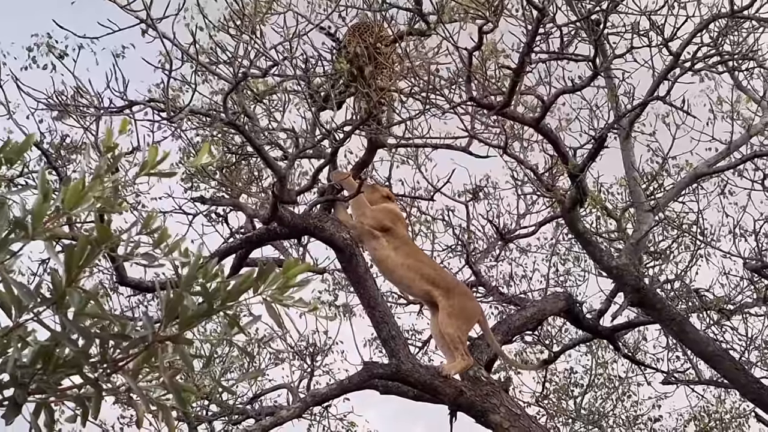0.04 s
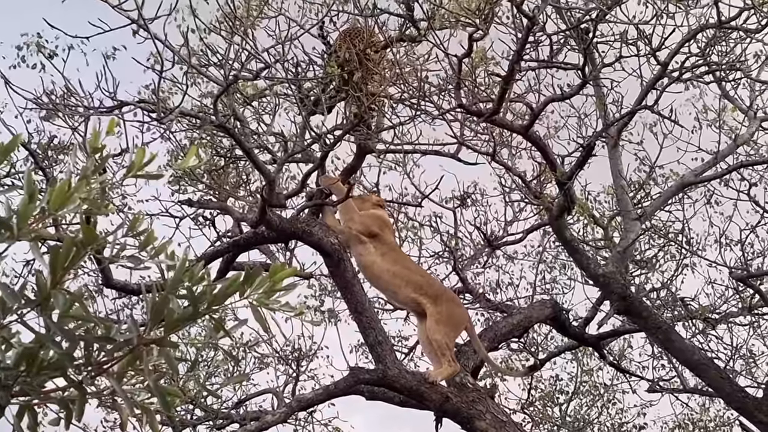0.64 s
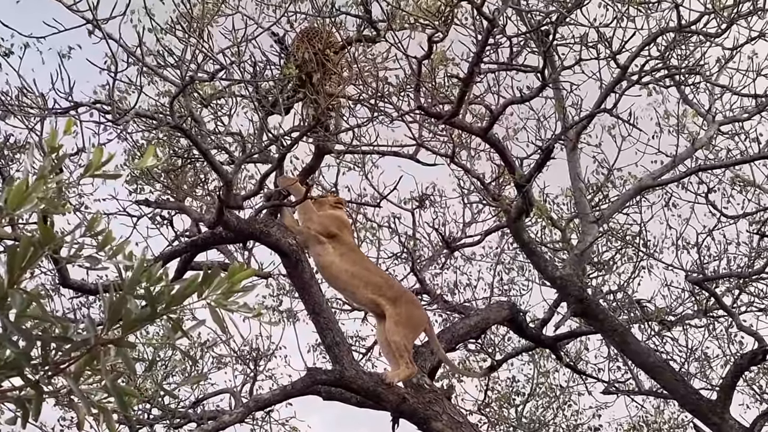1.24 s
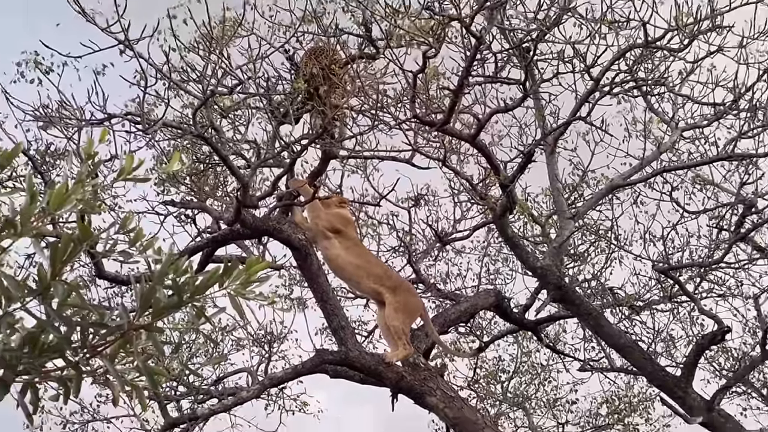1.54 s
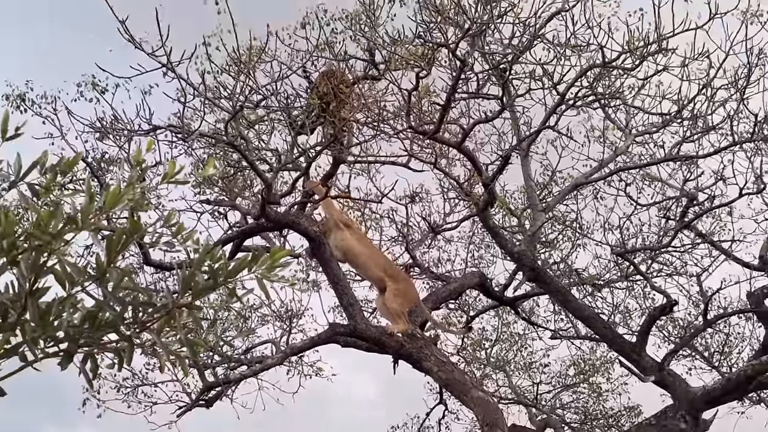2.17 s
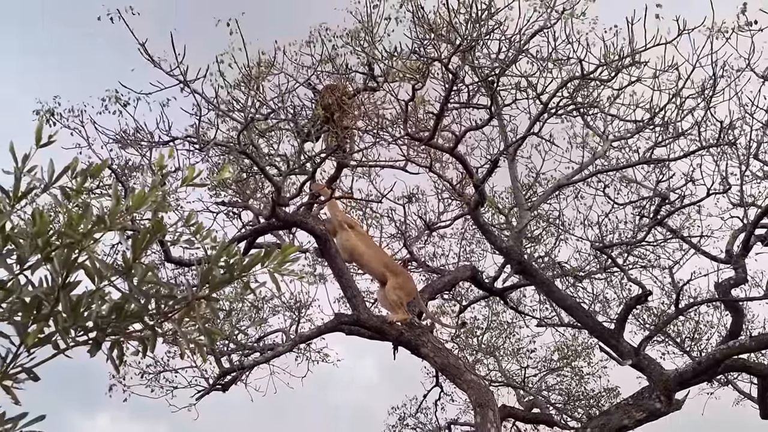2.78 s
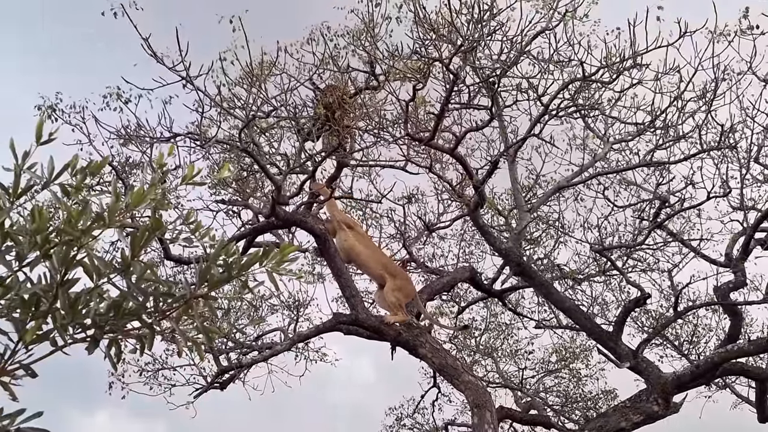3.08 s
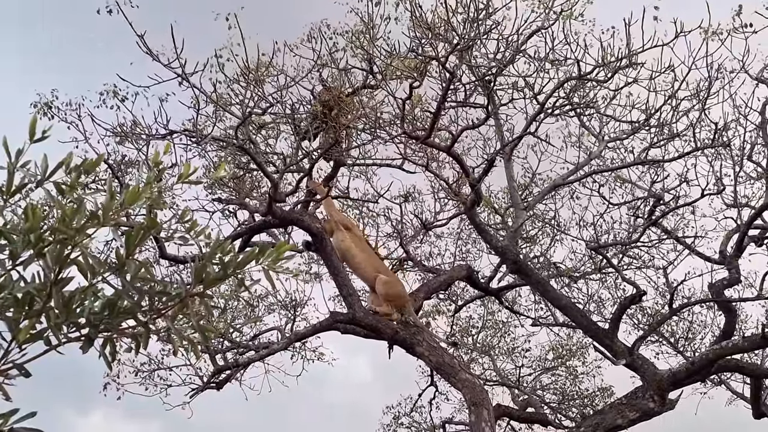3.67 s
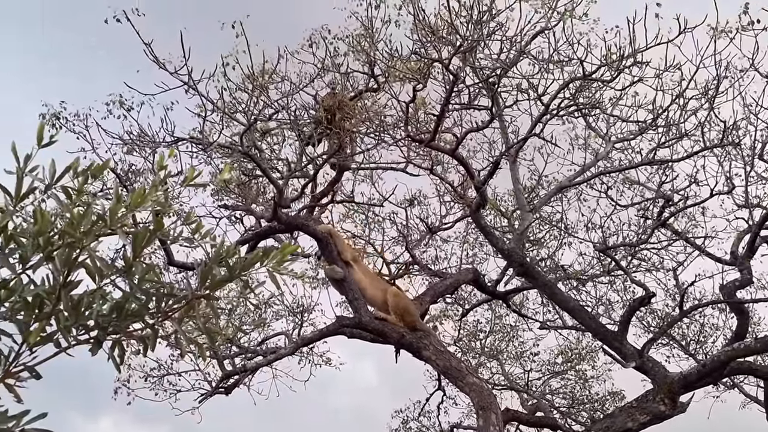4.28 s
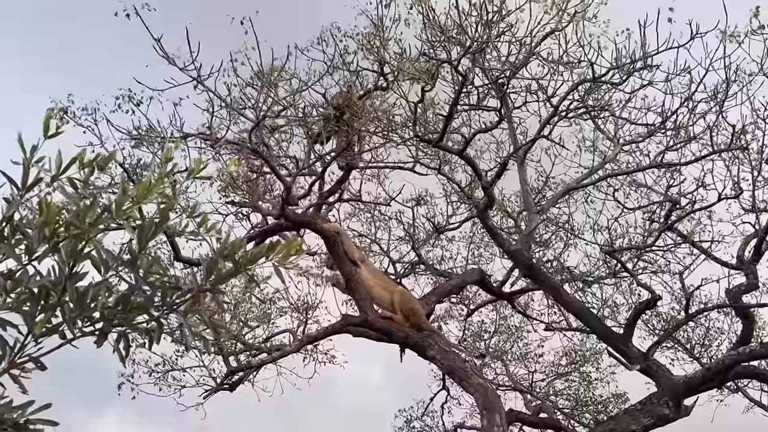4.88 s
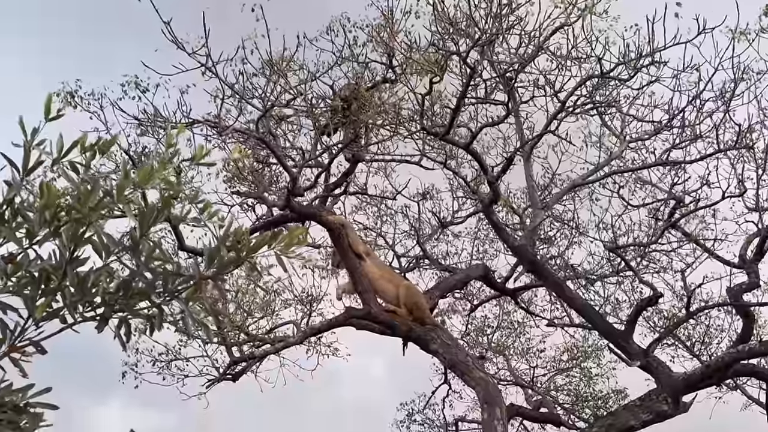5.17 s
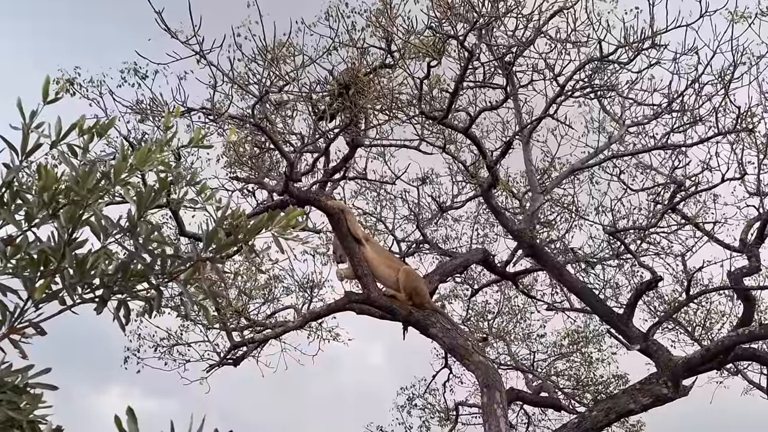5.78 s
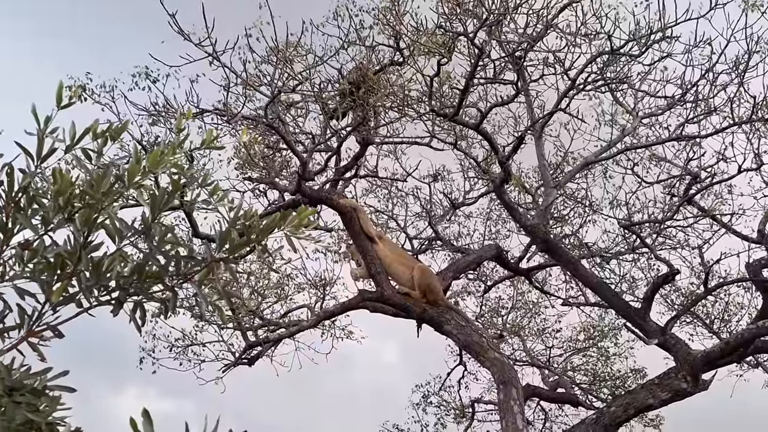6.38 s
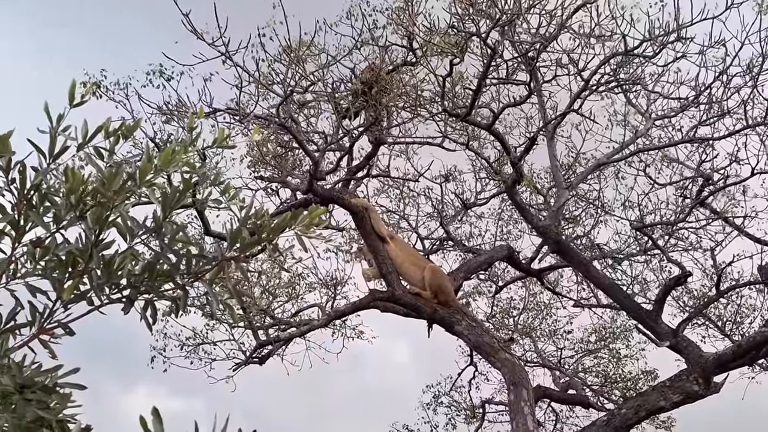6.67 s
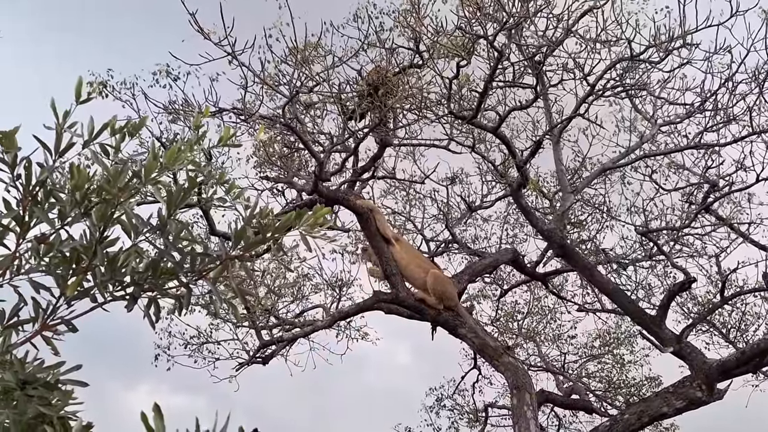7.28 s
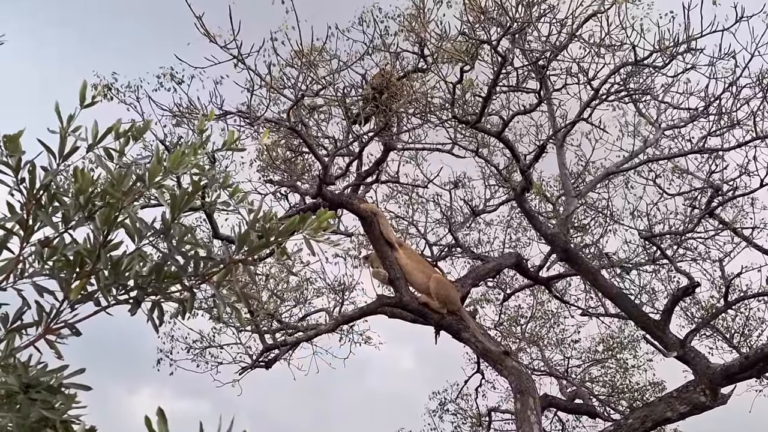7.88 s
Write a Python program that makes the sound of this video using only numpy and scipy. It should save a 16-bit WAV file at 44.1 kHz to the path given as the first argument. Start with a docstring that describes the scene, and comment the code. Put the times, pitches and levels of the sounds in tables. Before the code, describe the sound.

Harsh bursts of lion snarling alternate with throaty growls and hisses outdoors, then die down over a faint distant rumble.

```python
"""Lions quarrelling in a tree

Loud snarls over a kill alternate with low rattling growls, hisses and grunts. The voice is a source and a
filter: slack vocal folds slap shut 20-50 times a second, and each slap rings the long throat and lets out a
puff of turbulent air that rasps at the lips and teeth. Jaws and twigs click, twigs tick at random in the
branches, the trees scatter the sound, and a dull rumble of far growling lies under it all."""
import sys
import numpy as np
from scipy import signal
from scipy.fft import rfft, irfft
from scipy.io import wavfile
from scipy.ndimage import uniform_filter1d

SR = 44100
rng = np.random.default_rng(int(sys.argv[2]) if len(sys.argv) > 2 else 0)


def store_wav(level_fs):
    """Save 16-bit WAV to argv[1]."""
    pcm = np.round(np.clip(np.atleast_2d(level_fs), -1, 1) * 32767)
    wavfile.write(sys.argv[1], SR, pcm.T.astype(np.int16))


N = 354556
HZ = np.fft.rfftfreq(8192, 1 / SR)

# chest resonances: (frequency [Hz], bandwidth [Hz], gain [dB])
CHEST = [(90.5, 55, -3.5), (147.6, 35.7, 5.5), (194.3, 8.3, -0.5)]


def snarl(length, rise, rate, slowing, gape, chest_db, mouth_db, rasp_db, hiss_db,
          voice_sag_db, air_sag_db, mouth_hz, teeth_hz, sweep, step_db, *lips_hz):
    """Source and filter: fast, hard slaps excite resonances that glide as the jaws and lips move."""
    # resonances of the open mouth: (frequency [Hz], bandwidth [Hz], gain [dB])
    open_mouth = [(324, 20, -11.5), (383, 67, 1.5), (455.6, 72, -4), (524.6, 59, 2), (662, 49.5, -2),
                  (805, 110, -12)]
    # spectrum of air through the teeth: (frequency [Hz], gain [dB])
    teeth = [(1500, -38), (2400, -7), (2700, -4.5), (3100, -0.5), (3400, -4), (3750, -0.5), (4200, -3),
             (4900, -14), (5600, -15.5), (6700, -14), (7900, -13.5), (9000, -24.5), (11500, -23.5),
             (16000, -32)]
    t = np.arange(0, length + .11, 1 / SR)
    ahead = t + .011  # the push comes just before the ring
    voice_db = push(ahead, length, rise, onset_db=18, sag_db=voice_sag_db, settle=.46)
    rasp_db = rasp_db + push(ahead, length, rise, onset_db=30, sag_db=air_sag_db, settle=.7)
    hiss_db = hiss_db + push(ahead, length, rise * 1.13, onset_db=38, sag_db=air_sag_db, settle=.7)
    pressure = np.exp(-t / .1)
    slap_rate = rate * (1 - slowing * (1 - pressure))
    slaps, flow = folds(t, length, slap_rate, limp_db=.5, uneven_db=1.8, puff_s=.018, leak=.2 + .7 * gape)

    stretch = (mouth_hz / 470) ** .28  # the chest resonances partly follow the mouth
    damping = 1 + .94 * gape
    chest_modes = [(hz * stretch, width * damping, db) for hz, width, db in CHEST]
    groan_hz = 150.2 * stretch * (1 + .16 * pressure + .06 * wander(len(t), 25))
    chest = throat(slaps, flow, chest_db + voice_db, chest_modes, rough=.05)
    chest = formants(chest, [groan_hz], width=41.4 * damping, spill_db=-3)
    closing_hz = mouth_hz * (1 - .1 * (np.minimum(t / length, 1) - .5))  # falls as the jaws close
    mouth = throat(slaps, flow, mouth_db + voice_db, open_mouth, rough=.3)
    mouth = formants(mouth, [closing_hz], width=95, spill_db=-11)

    rasp, hiss = turbulence(slaps, build_up(flow), rasp_db, hiss_db, teeth,
                            snap=.04, spittle_db=3.5, pulsing=.95)
    # the lip resonances quiver, and sweep up as the lips are drawn back
    bared = np.interp(t, [0, rise, max(length, rise)], [0, 1, .55]) ** 1.5
    centres = [hz * (1 - sweep * (1 - bared)) * (1 + .025 * wander(len(t), 50)) for hz in lips_hz]
    rasp = formants(rasp, centres, width=85, spill_db=-18.5, step_db=step_db)
    upper_ring = gain_of(-.5) * resonate(hiss, teeth_hz, width=120)
    lower_ring = gain_of(-5) * resonate(hiss, .71 * teeth_hz, width=89)
    hiss = hiss + upper_ring + lower_ring
    return gain_of(-3.5) * chest + gain_of(-5) * mouth + gain_of(-8.5) * rasp + gain_of(-2.4) * hiss


def growl(row, mouth_modes, chest_gain_db, mouth_gain_db, puff_s, rough, limp_db):
    """Pulse excitation of steady resonances: slow, soft slaps gurgle; air wheezes at lips and teeth."""
    length, rate, leak, *levels_db, swell_db, mouth_hz, teeth_hz, step_db = row[:-3]
    lips_hz = row[-3:]
    t = np.arange(0, length + .11, 1 / SR)
    ramp_db = swell_db * (np.minimum(t / length, 1) - .5)
    chest_db, mouth_db, rasp_db, hiss_db = (db + ramp_db for db in levels_db)
    slaps, flow = folds(t, length, np.full(len(t), rate), limp_db, uneven_db=1.7, puff_s=puff_s, leak=leak)
    flow = build_up(flow)
    chest = throat(slaps, flow, chest_db + chest_gain_db, CHEST, rough=.17)
    mouth = throat(slaps, flow, mouth_db + mouth_gain_db, mouth_modes, rough)
    mouth = formants(mouth, [mouth_hz], width=60, spill_db=-10.5)
    # spectrum of air between tongue and palate: (frequency [Hz], gain [dB])
    palate = [(1500, -33.5), (2700, -6), (3300, 1), (4100, -2), (4700, -4.5), (5400, -8), (6500, -9),
              (7900, -8), (8900, -18), (11500, -30), (16000, -35.5)]
    rasp, hiss = turbulence(slaps, flow, rasp_db, hiss_db, palate, snap=.01, spittle_db=5, pulsing=.55)
    rasp = formants(rasp, lips_hz, width=57, spill_db=-11.5, step_db=step_db)
    hiss = hiss + gain_of(8.5) * resonate(hiss, teeth_hz, width=100)
    return chest + mouth + gain_of(-6) * rasp + gain_of(-7.5) * hiss


def push(t, length, rise, onset_db, sag_db, settle):
    """Breath pressure sets the level [dB]: it rises to 0, then changes by -sag_db as the air is spent."""
    spent = np.clip((t - rise) / max(length - rise, .01), 0, 1)
    attack_db = -onset_db * np.clip(1 - t / rise, 0, 1) ** 1.88
    return attack_db - sag_db * np.expm1(-spent / settle) / np.expm1(-1 / settle)


def folds(t, end, rate, limp_db, uneven_db, puff_s, leak):
    """Glottal source: slaps with jitter and shimmer, and the air flow that bursts out after each."""
    cycles = np.cumsum(rate * (1 + .018 * wander(len(t), 40))) / SR
    at = np.flatnonzero((np.diff(np.floor(cycles), prepend=-1) > 0) & (t < end))
    limp = unit_rms(gain_of(-limp_db * (np.arange(len(at)) % 2)))  # weakens every second slap
    shimmer = gain_of(uneven_db * rng.standard_normal(64)[:len(at)])
    slaps = np.zeros(len(t))
    slaps[at] = np.sqrt(SR / rate[at]) * limp * shimmer
    puffs = unit_rms(decay(slaps, puff_s))
    stream = leak * np.exp(-np.maximum(t - end, 0) / .034)  # steady air between the slaps
    attack = np.minimum(t / .0037, 1)
    return slaps, unit_rms((puffs + stream) * attack)


def build_up(flow):
    """First-order lag: deep in the throat each puff takes a moment to build up."""
    return unit_rms(decay(flow, tau_s=.0012))


def throat(slaps, flow, db, modes, rough):
    """Cavity resonance: slaps and turbulence (the share rough of the power) ring the low modes."""
    drive = np.sqrt(1 - rough) * slaps + np.sqrt(rough) * flow * rng.standard_normal(len(flow))
    radiation = HZ ** 2 / (HZ ** 2 + 60 ** 2)  # a mouth hardly radiates the deepest bass
    return ring(drive * gain_of(db), resonances(modes) * radiation)


def formants(x, centres, width, spill_db, step_db=0):
    """Formant filtering: resonances step_db apart in gain recolour x and keep its short-term power."""
    peaks = sum(gain_of(step_db * k) * resonate(x, hz, width) for k, hz in enumerate(centres))
    shaped = peaks + gain_of(spill_db) * x
    before, after = (abs(uniform_filter1d((v ** 2).mean(0), size=3000)) + 1e-16 for v in (x, shaped))
    return shaped * np.sqrt(before / after)


def turbulence(slaps, flow, rasp_db, hiss_db, hiss_colour, snap, spittle_db, pulsing):
    """Flow noise: each puff rasps at the lips, crackling with spittle, and hisses at the teeth."""
    # lip resonances: (frequency [Hz], bandwidth [Hz], gain [dB])
    lips = [(830, 450, -18.5), (1000, 130, -16), (1166, 830, -1.5), (1290, 140, -4), (1747, 230, -2),
            (2008, 355, -5), (2375, 230, -8.5), (2980, 200, -15.5)]
    n = len(flow)
    crackle = unit_rms(gain_of(spittle_db * wander(n, 500)))
    drive = noise_pair(n, .83) * flow * crackle + snap * slaps
    rasp = ring(drive * gain_of(rasp_db), resonances(lips))
    breath = flow ** pulsing * signal.windows.tukey(n, .1)
    hiss = ring(noise_pair(n, .31) * breath * gain_of(hiss_db), spectrum(hiss_colour))
    return flutter(hollow(rasp, echo=.52), depth_db=4), flutter(hollow(hiss, echo=.22), depth_db=3.6)


def flutter(x, depth_db):
    """Random modulation: quivering wet tissue lets different narrow bands whistle from puff to puff."""
    bands = signal.stft(x, nperseg=512)[2]
    patches = uniform_filter1d(rng.standard_normal(bands.shape[1:]), size=3, axis=0)
    patches = unit_rms(uniform_filter1d(patches, size=5, axis=1))
    gains = unit_rms(gain_of(depth_db * np.tanh(patches / 2) * 2))
    return signal.istft(bands * gains, nperseg=512)[1][:, :x.shape[1]]


def hollow(x, echo, delay_s=.0066):
    """Comb filtering: a close reflection interferes with the direct noise and makes it hollow."""
    late = np.pad(x, ((0, 0), (round(delay_s * SR), 0)))[:, :x.shape[1]]
    return (x + echo * late) / np.sqrt(1 + echo ** 2)


def blow(length, rise, db, colour):
    """Turbulence without voicing: a breath of coloured noise swells and dies away."""
    t = np.arange(0, length, 1 / SR)
    swell_db = push(t, length, rise, onset_db=19, sag_db=16, settle=.7)
    envelope = gain_of(db + swell_db + wander(len(t), 170)) * signal.windows.tukey(len(t), .1)
    return ring(noise_pair(len(t), .27) * envelope, spectrum(colour))


def grunt(length, db, pitch_hz):
    """Nearly periodic vibration: the folds briefly hum a rough, falling note of three harmonics."""
    t = np.arange(0, length, 1 / SR)
    hz = pitch_hz * (1 - .075 * (t / length - .5))
    cycles = np.cumsum(hz * (1 + .152 * wander(len(t), 203))) / SR
    note = unit_rms(sum(gain_of(-15 * k) * np.sin(2 * np.pi * (k + 1) * cycles) for k in range(3)))
    return gain_of(db + .51 * wander(len(t), 150)) * note * np.sin(np.pi * t / length)


def transient(db, hz, width_hz, t60):
    """Burst excitation of one resonance: a throat knock, a whistle at the teeth, a jaw or twig click."""
    t = np.arange(SR // 5) / SR
    burst = noise_pair(len(t), .45) * gain_of(-60 * t / t60)
    rung = ring(burst, resonances([(hz, width_hz, 0), (hz, 3 * hz, -27)]))
    return gain_of(db) * rung / abs(rung).max()


def twigs(length, ticks_per_s, db):
    """Poisson impacts: twigs tick at random among the branches."""
    # spectrum of a twig tick: (frequency [Hz], gain [dB])
    bark = [(1500, -27), (4000, -8), (5500, 0.5), (7900, -1.5), (9000, -11.5), (16000, -22)]
    n = round(length * SR)
    strikes = rng.random(n) < ticks_per_s / SR
    strength = gain_of(5 * np.minimum(rng.exponential(1, n), 3))
    bursts = unit_rms(decay(strikes * strength, tau_s=.0033))
    return gain_of(db) * ring(noise_pair(n, .4) * bursts, spectrum(bark))


def branches(x, wet_db, t60):
    """Scattering: the trees add a thin, decaying tail that is different in each ear."""
    # spectrum of the scatter: (frequency [Hz], gain [dB])
    colour = [(150, -13.5), (600, -11), (1500, -6.5), (8000, -4.5), (16000, 1)]
    t = np.arange(SR // 2) / SR
    tail = rng.standard_normal((2, len(t))) * gain_of(-60 * t / t60) * (t > .004)
    tail = ring(tail / np.linalg.norm(tail[0]), spectrum(colour))
    return x + gain_of(wet_db) * signal.fftconvolve(x, tail, axes=1)[:, :N]


def far_rumble():
    """Amplitude modulation: far growling is low noise that throbs about 17 times a second."""
    # course of the rumble: (time [s], level [dB])
    course = [(0, -53), (.75, -55.5), (1.15, -56), (1.25, -53.5), (3.7, -51), (5.9, -52), (6.15, -62.5),
              (6.26, -69.5), (6.38, -56), (7.3, -54.5), (8.04, -49.5)]
    # its spectrum: (frequency [Hz], gain [dB])
    colour = [(20, -36.5), (42, 1.5), (85, 3.5), (135, -0.5), (180, -10.5), (240, -26.5), (310, -18),
              (450, -40.5), (1000, -63.5), (3000, -84)]
    throb_hz = 17 + 3 * wander(N, 4.1)
    throb = unit_rms(gain_of(4.7 * np.sin(2 * np.pi * np.cumsum(throb_hz) / SR)))
    level_db = np.interp(np.arange(N) / SR, *np.transpose(course))
    return ring(noise_pair(N, .87) * throb * gain_of(level_db), spectrum(colour))


def still_air():
    """Diffuse noise: a faint, even hush, nearly uncorrelated between the ears."""
    # spectrum of the hush: (frequency [Hz], gain [dB])
    colour = [(240, -32), (400, -3), (520, -7), (918, -13), (1140, -14.5), (2070, -15.5), (2350, -17.5),
              (4020, -20.5), (8400, -23), (12900, -19.5), (15800, -26)]
    return gain_of(-78.5) * ring(noise_pair(N, .083), spectrum(colour))


def gain_of(db):
    """Amplitude ratio of a level in decibels."""
    return 10 ** (np.asarray(db) / 20)


def unit_rms(x):
    """Normalisation to a mean power of 1."""
    return x / np.sqrt(np.mean(x ** 2) + 1e-20)


def spectrum(points):
    """Gain over HZ, interpolated in decibels along log frequency."""
    hz, db = np.transpose(points)
    return gain_of(np.interp(np.log(HZ + 1), np.log(hz + 1), db))


def resonances(modes):
    """Gain over HZ as a sum of Lorentzian peaks."""
    return sum(gain_of(db) / (1 + (2 * (HZ - hz) / width) ** 2) for hz, width, db in modes)


def ring(x, gain):
    """Minimum-phase filtering by a gain over HZ, with an impulse response of unit energy."""
    log_gain = np.log(np.maximum(gain / gain.max(), 1e-5))
    mirrored = np.r_[log_gain, log_gain[-2:0:-1]]
    taps = np.fft.ifft(np.exp(np.conj(signal.hilbert(mirrored)))).real[:len(HZ)]
    taps = taps / np.linalg.norm(taps)
    return signal.oaconvolve(np.atleast_2d(x), taps[None], axes=1)[:, :x.shape[-1]]


def resonate(x, hz, width):
    """Damped resonator of gain 1 at hz, steady or gliding."""
    phasor = np.exp(2j * np.pi * np.cumsum(hz * np.ones(x.shape[-1])) / SR)
    pole = np.exp(-np.pi * width / SR)
    return 2 * (phasor * signal.lfilter([1 - pole], [1, -pole], x / phasor)).real


def decay(x, tau_s):
    """Leaky integration: each impulse leaves an exponential tail."""
    return signal.lfilter([1], [1, -np.exp(-1 / (tau_s * SR))], x)


def wander(n, per_s):
    """Random drift: straight lines through per_s Gaussian values a second."""
    knots = rng.standard_normal(1024)
    return np.interp(np.arange(n) * per_s / SR, np.arange(len(knots)), knots)


def noise_pair(n, correlation):
    """Partly coherent white noise for two ears."""
    shared, *own = rng.standard_normal((3, n))
    return np.sqrt(correlation) * shared + np.sqrt(1 - correlation) * np.array(own)


def add(mix, start, sound):
    """Superposition of a sound on the mix from start [s]."""
    part = mix[:, round(start * SR):][:, :sound.shape[-1]]
    part += sound[..., :part.shape[1]]


def scene():
    """Superposition: voices and transients, scattered by the trees, over the background."""
    mix = np.zeros((2, N))
    # pushes of breath, two or three to a long snarl: (start [s], length [s], rise [s], slap rate [1/s],
    # slowing [share], gape [0-1], chest, mouth, rasp and hiss drive [dB], voice sag [dB], air sag [dB],
    # mouth resonance [Hz], teeth resonance [Hz], lip sweep [share], step between lip resonances [dB],
    # three lip resonances [Hz])
    snarls = [ (.005, 0.17, 0.026, 31.33, 0.16, 0.41, -29, -28.5, -40, -59.5, 4.5, 4.5, 493, 3650, 0.066, -6, 1090, 1250, 2270),
              (1.797, .23, 0.13, 36.5, 0.031, 0.72, -25, -35.5, -30, -44, 9.5, 16.5, 574, 3980, 0.34, 7, 1380, 1640, 1906),
              (2.523, .18, 0.073, 45.2, 0.21, .5, -18.5, -24.5, -26, -43, 10.5, 5, 516, 3060, 0.14, 3, 1040, 1630, 2006),
              (2.747, 0.067, 0.0036, 31.1, 0, 0, -23.5, -31.5, -41.5, -55, 5, 2, 454, 3750, 0.046, 6.5, 970, 1360, 1950),
              (2.809, 0.074, .003, 31.49, 0.044, 0.16, -27.5, -27.5, -41.5, -51.5, 7.5, 6, 503, 3680, .04, -3.5, 1360, 1800, 2240),
              (3.319, .045, 0.02, 42.56, 0.12, 0.27, -26, -27.5, -34.5, -60.5, -2, -2.5, 520, 3800, 0.063, -21, 1236, 1480, 1760),
              (3.368, 0.047, 0.013, 41.55, 0.039, 0.16, -20.5, -28.5, -41.5, -56, -0.5, -4, 465, 4080, 0.11, 0, 1010, 1320, 1680),
              (3.425, 0.09, 0.028, 31.6, 0.013, 0.9, -28, -33, -33, -53.5, 7, 2, 560, 3070, .06, -8.5, 1350, 1640, 1920),
              (3.519, 0.051, 0.0099, 37.1, 0.053, 0.13, -31.5, -37.5, -35.5, -49, -6, 9.5, 580, 3260, 0.027, -5.5, 1343, 1610, 2000),
              (3.569, 0.084, .004, 36.1, 0.011, 0, -20.5, -26.5, -36.5, -55, 3, 3, 446, 4150, 0.044, -1.5, 997, 1313, 2080),
              (4.095, 0.13, 0.075, 45.92, 0.025, 0.19, -15.5, -19, -27, -43.5, 3.5, -1, 430, 3730, 0.075, -5, 1393, 1616, 1680),
              (4.232, .12, .005, 38.9, 0.02, .5, -31.5, -38, -29.5, -48.5, -5, 0.5, 400, 3650, .04, -3, 1425, 1680, 2090),
              (4.361, 0.48, 0.024, 43.2, .25, 0.036, -19.5, -29, -30.5, -46, 8.5, 13.5, 407, 3730, 0.098, -3.5, 1413, 1676, 2230),
              (5.297, .045, 0.043, 41.37, 0.05, 0, -25, -32, -31.5, -54.5, 2, 7, 526, 4000, 0.068, -4, 1440, 1660, 2420),
              (5.347, .042, .004, 41.8, 0.016, 0.23, -22.5, -34.5, -40.5, -53, 2.5, -4, 473, 3930, 0.032, 2, 1430, 1750, 2490),
              (5.404, 0.17, 0.0059, 32.17, 0.087, 0.38, -34.5, -43.5, -33.5, -48.5, 0.5, 7.5, 527, 3050, 0.062, 0, 1477, 2150, 2560),
              (5.61, .12, 0.0041, 27.22, 0.18, 0.65, -43, -56, -45.5, -62, 0, 11.5, 566, 3810, .03, -3.5, 1440, 2134, 2510),
              (7.402, 0.1, 0.063, 39.05, 0.26, 0.87, -45, -52, -51.5, -65, 3.5, -4, 508, 3950, .1, 3, 1475, 1890, 2160),
              (7.515, .06, 0.026, 42.1, 0.025, 1, -34, -35, -41.5, -57, 10, 7, 470, 3850, 0.11, 1.5, 1500, 1800, 2070),
              (7.589, 0.068, 0.009, 40.9, .25, 0.93, -38.5, -43, -38.5, -56, 0.5, 8.5, 454, 3860, 0.095, -2, 1520, 1740, 2030),
              ]
    for start, *row in snarls:
        add(mix, start, snarl(*row))

    # growls through nearly shut jaws: (start [s], length [s], slap rate [1/s], steady air to puffs
    # [ratio], chest, mouth, rasp and hiss drive [dB], swell [dB], mouth resonance [Hz],
    # teeth resonance [Hz], step between lip resonances [dB], three lip resonances [Hz])
    growls_out = [ (.236, .21, 23, 0.19, -52, -68.5, -64.5, -73, -18, 463.8, 3390, 3.5, 926, 1373, 2320),
                  (1.425, 0.12, 21, 0.47, -48, -68.5, -68.5, -70, -4, 780, 3560, -0.5, 1360, 1860, 2120),
                  (1.57, 0.15, 21, 0.089, -46, -65.5, -65.5, -76.5, -5, 740, 3660, 4.5, 1410, 1800, 2155),
                  (2.059, 0.45, 21.2, 0.47, -51, -61, -61.5, -68.5, -5.5, 722, 3078, 6, 1236, 1606, 2033),
                  (2.895, 0.39, 20.9, 0.79, -54, -59.5, -58.5, -59, -3.5, 894, 3830, 2, 940, 1150, 2160),
                  (4.862, .13, 21.3, 0.23, -46, -60, -59.5, -64.5, 1, 766, 3250, -2, 1096, 1730, 1997),
                  (5.005, 0.14, 21, 0.73, -46, -65, -64, -75.5, 1, 770, 3230, -4.5, 1100, 1710, 2010),
                  (5.155, .12, 19.5, .15, -48.5, -61, -58.5, -72.5, -9, 775, 3370, -3, 1100, 1670, 2030),
                  (5.799, 0.31, 19.7, .25, -58, -73, -76, -95.5, -8.5, 756, 3420, 1.5, 1450, 1727, 2130),
                  (7.678, 0.1, 27, 0.54, -52, -65.5, -63, -75, -7, 540, 3870, -2, 1020, 1460, 1900),
                  (7.775, 0.27, 33, 0.088, -47, -72, -63, -74, -15.5, 570, 3840, 7, 1500, 1826, 2050), ]
    # growls on indrawn air: same columns
    growls_in = [ (0.583, 0.098, 30.05, 0.28, -49, -64, -70.5, -73, -5, 730, 3530, -1, 885, 1420, 2400),
                 (.707, 0.11, 28.55, 0.091, -52.5, -62.5, -70.5, -75.5, 5, 730, 3100, -2, 1230, 1750, 2410),
                 (.845, .275, 27.23, 0.082, -48, -57.5, -65, -69, -5, 780, 3060, 0, 1090, 1730, 2060),
                 (3.69, 0.34, 29.42, 0.87, -42, -47.5, -48.5, -53, 6.5, 856, 4060, -9, 1054, 1777, 1980), ]
    # mouth resonances for each kind: (frequency [Hz], bandwidth [Hz], gain [dB])
    mouth_out = [(298.6, 16, 1), (424, 135, 7), (735, 55, -5.5), (886, 97, -6.5)]
    mouth_in = [(303.2, 36, 12.5), (503, 310, -9), (810, 120, -17), (1100, 51, -13)]
    for start, *row in growls_out:
        add(mix, start, growl(row, mouth_out, chest_gain_db=-3.5, mouth_gain_db=1,
                              puff_s=.017, rough=.74, limp_db=0))
    for start, *row in growls_in:
        add(mix, start, growl(row, mouth_in, chest_gain_db=-1.5, mouth_gain_db=1.5,
                              puff_s=.0091, rough=.42, limp_db=1))

    # sharp throat knocks, brief whistles at the teeth, and clicks of jaws and twigs:
    # (time [s], peak [dB], resonance [Hz], bandwidth [Hz], T60 [s])
    transients = [(.822, -49.5, 6000, 9000, 0.0069), (.839, -46, 900, 1400, .008),
                  (1.025, -57, 6600, 1100, .026), (1.832, -28.5, 394, 120, 0.032),
                  (2.104, -39, 780, 220, 0.042), (2.69, -36, 3080, 120, 0.086),
                  (2.697, -22, 518, 150, 0.0493), (3.46, -33.5, 3300, 1300, .07),
                  (3.568, -44, 12000, 5000, 0.066), (3.622, -30, 640, 200, 0.041),
                  (3.623, -47.5, 12300, 4000, 0.14), (3.89, -38.5, 3700, 800, .035),
                  (3.905, -33, 1052, 295.4, 0.086), (3.988, -43, 7500, 3000, .05),
                  (4.055, -23.5, 950, 380, 0.11), (4.285, -29.5, 1048, 294.7, .06),
                  (4.335, -23.5, 1660, 200, .065), (4.381, -30, 3300, 1500, 0.1),
                  (4.595, -33.5, 950, 290, .12), (6.843, -63.5, 13240, 2990, .028)]
    for start, *row in transients:
        add(mix, start, transient(*row))

    # a hiss, huffs, and spittle sprayed through bared teeth: (start [s], length [s], rise [s], level [dB])
    hisses = [(1.18, 0.28, 0.12, -53.5)]
    huffs = [(7.175, .04, 0.016, -53.5), (7.213, 0.074, 0.015, -55.5)]
    sprays = [(1.85, 0.13, 0.035, -50), (3.81, 0.48, 0.23, -63)]
    # their spectra: (frequency [Hz], gain [dB])
    hiss_colour = [(290, -21), (500, -12.5), (657, -20), (748, -1.5), (982, -13.5), (1040, -17),
                   (1530, -18.5), (2390, -14), (2720, -28), (3150, -15), (5200, -28), (6360, -25.5),
                   (9370, -35.5), (14200, -38), (15500, -38)]
    huff_colour = [(600, -15), (1200, -11), (1750, 7.5), (2300, -5), (3000, -21), (3900, -17.5),
                   (5000, -30), (7800, -22), (9500, -36), (16000, -34)]
    spray_colour = [(2500, -32), (5200, 1), (7500, 4.5), (9500, -6.5), (12000, -2), (16000, -9.5)]
    for rows, colour in (hisses, hiss_colour), (huffs, huff_colour), (sprays, spray_colour):
        for start, *row in rows:
            add(mix, start, blow(*row, colour))

    # short voiced grunts: (start [s], length [s], level [dB], pitch [Hz])
    grunts = [(1.758, 0.083, -31, 159.7), (6.462, 0.062, -48, 211), (7.396, 0.068, -37, 179.5)]
    for start, *row in grunts:
        add(mix, start, grunt(*row))
    add(mix, 2.5, twigs(length=2, ticks_per_s=48.5, db=-71))
    return branches(mix, wet_db=-2.5, t60=.22) + far_rumble() + still_air()


def record(dry):
    """Frequency response: two microphones of slightly unlike colour, then a band limit."""
    # channel balance: (frequency [Hz], left minus right [dB])
    balance = [(100, -1.4), (550, -1.5), (1100, 1.4), (4000, 0), (12000, 1)]
    lean_db = np.interp(np.fft.rfftfreq(N, 1 / SR), *np.transpose(balance))
    pair = irfft(rfft(dry) * gain_of(np.array([lean_db, -lean_db]) / 2), N)
    lowpass = signal.firwin(511, 15800, window=("kaiser", 9), fs=SR)
    return signal.oaconvolve(pair, lowpass[None], "same")


dry = scene()
out = record(dry)
store_wav(out)
```